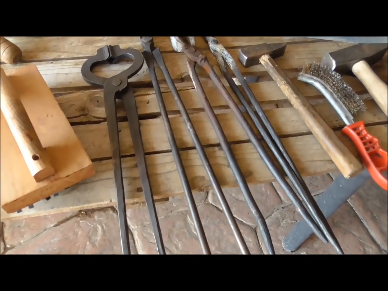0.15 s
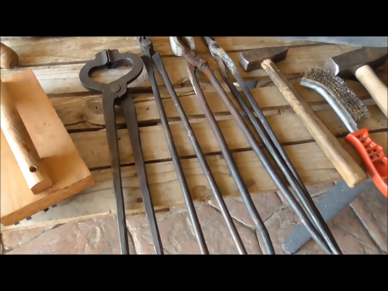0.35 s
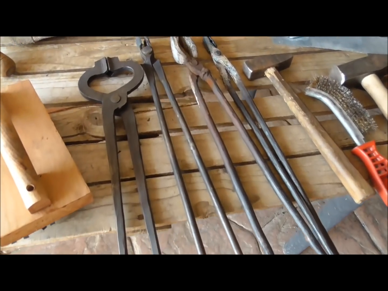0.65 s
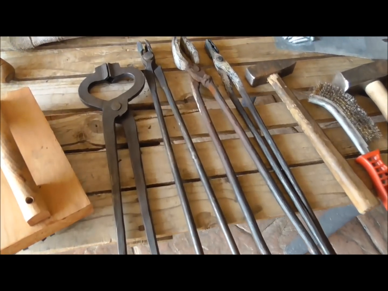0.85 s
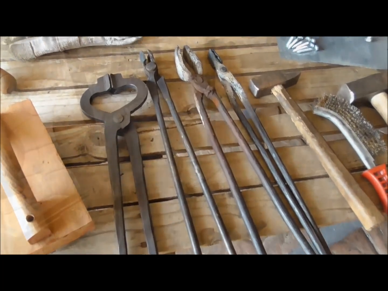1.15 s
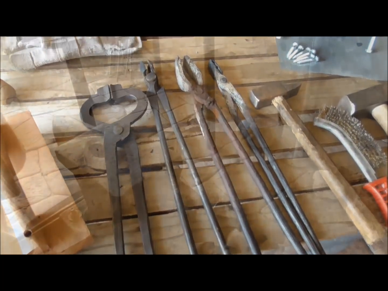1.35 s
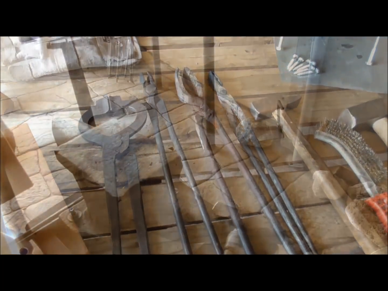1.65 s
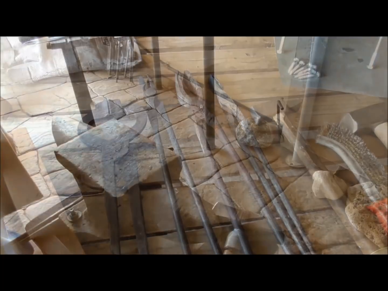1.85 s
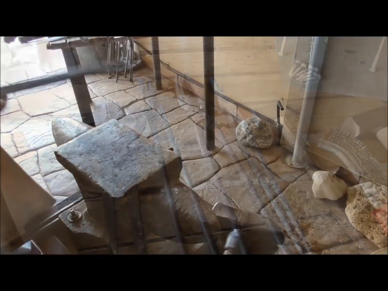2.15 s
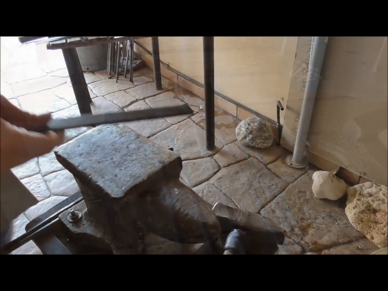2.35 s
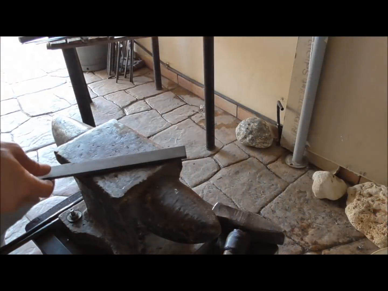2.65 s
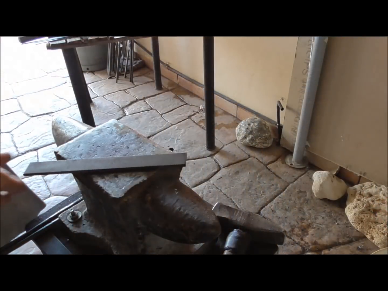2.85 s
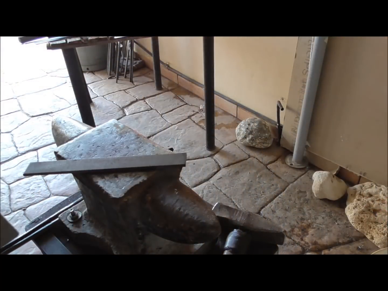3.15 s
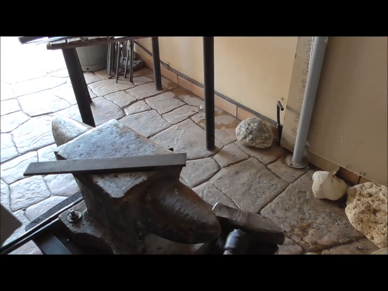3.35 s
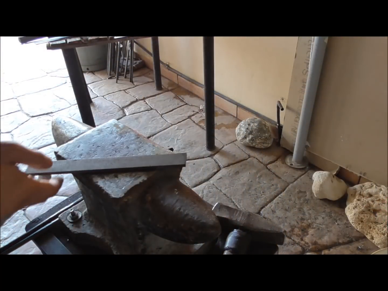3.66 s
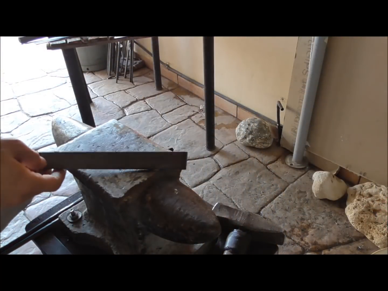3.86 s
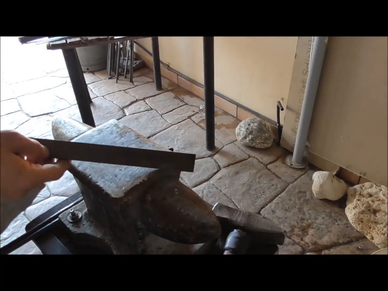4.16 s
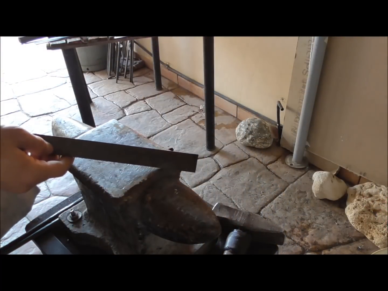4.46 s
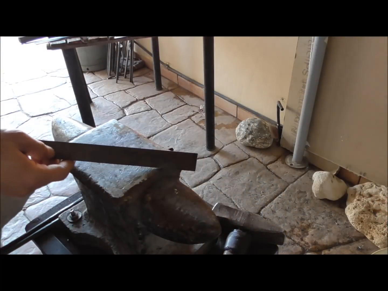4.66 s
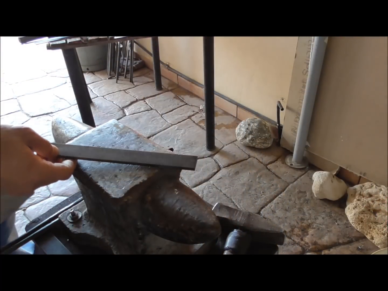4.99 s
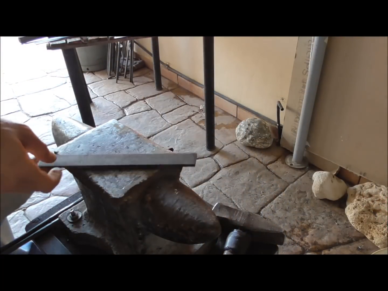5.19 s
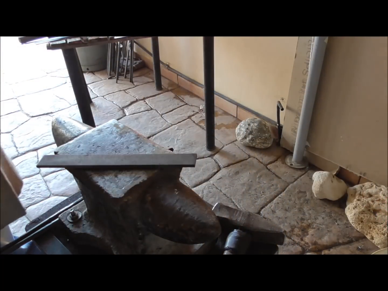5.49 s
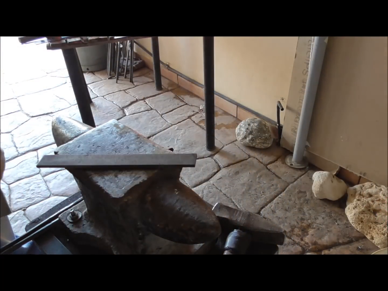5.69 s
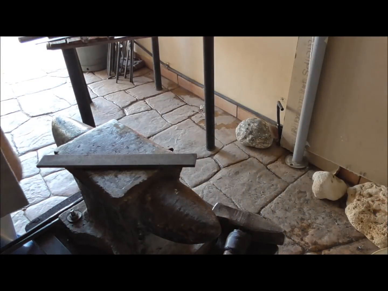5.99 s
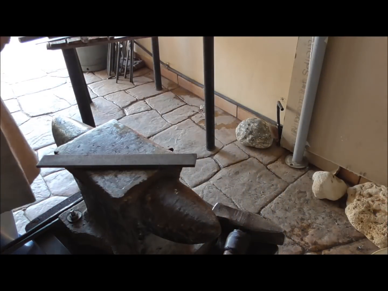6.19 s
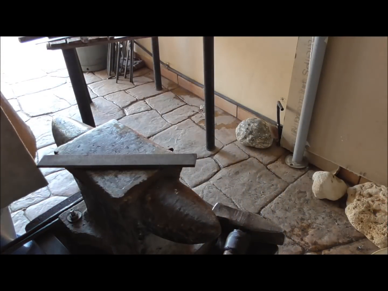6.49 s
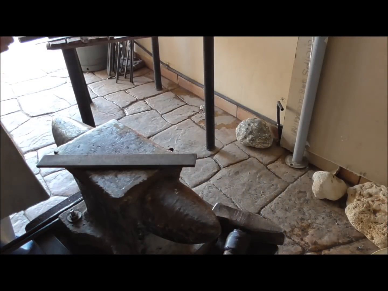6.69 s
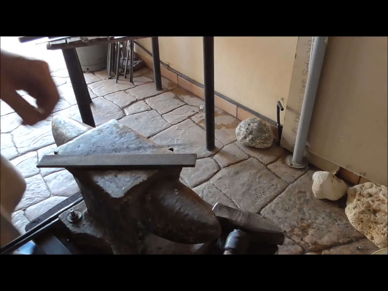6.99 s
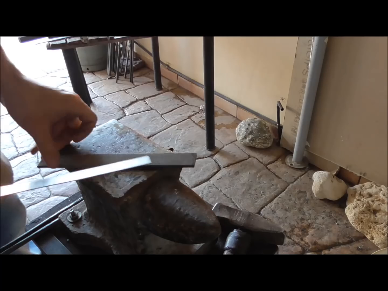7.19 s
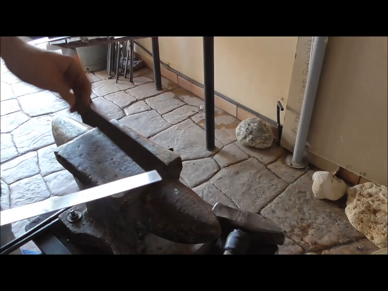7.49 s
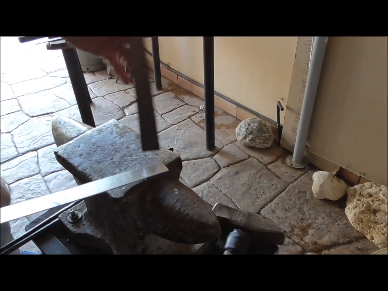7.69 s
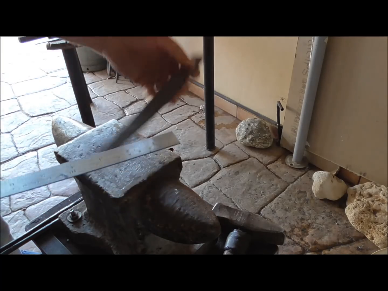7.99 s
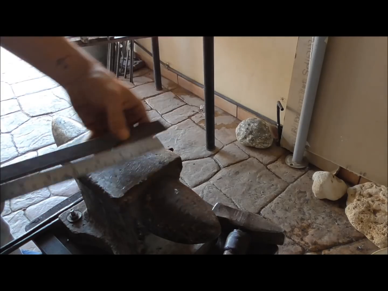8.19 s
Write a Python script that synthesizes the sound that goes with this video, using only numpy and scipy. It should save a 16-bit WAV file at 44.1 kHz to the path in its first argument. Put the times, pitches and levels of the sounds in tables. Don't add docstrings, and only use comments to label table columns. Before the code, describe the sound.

A gas forge roars steadily while small steel tools rattle, then a steel bar clinks loudly onto an anvil and is later slid about.

```python
import sys
import numpy as np
from scipy import signal
from scipy.fft import rfft, irfft
from scipy.io import wavfile

SR = 44100
rng = np.random.default_rng(int(sys.argv[2]) if len(sys.argv) > 2 else 0)


def bounce(signal):
    frames = np.transpose(np.atleast_2d(signal))
    limited = np.clip(frames, -1, 1)
    pcm = np.round(limited * 32767).astype(np.int16)
    wavfile.write(sys.argv[1], SR, pcm)


def level_to_linear(level):
    exponent = np.asarray(level, float) / 20
    return 10 ** exponent


N = 367794
TIME = np.arange(N) / SR
HZ = np.maximum(np.arange(N // 2 + 1) * SR / N, 1)
LAID, RATTLING, TAPPED, TURNED, DRAGGED, SWUNG = range(6)


def rms_one(x):
    return x / np.sqrt(np.mean(x ** 2) + 1e-20)


def at_hz(points, hz):
    point_hz, point_db = np.array(points).T
    return np.interp(np.log(hz), np.log(point_hz), point_db)


def drift(rate):
    pole = np.exp(-80 * np.pi * rate / SR)
    white = rng.standard_normal(N // 40 + 2002)
    slow = signal.lfilter([1], [1, -2 * pole, pole * pole], white)[2000:]
    return np.interp(np.arange(N) / 40, np.arange(len(slow)), rms_one(slow))


def ring(clicks, hz, t60):
    decay, turn = level_to_linear(-60 / (t60 * SR)), 2 * np.pi * hz / SR
    return signal.lfilter([0, np.sin(turn)], [1, -2 * decay * np.cos(turn), decay * decay], clicks + 1e-18)


def fade(steps, t60):
    return signal.lfilter([1], [1, -level_to_linear(-60 / (t60 * SR))], steps + 1e-18)


def swell(start, hold, rise, fall):
    rising = 1 + (TIME - start) / rise
    falling = 1 - (TIME - start - hold) / fall
    return np.clip(np.minimum(rising, falling), 0, 1)


def gesture(start, hold, db, rise_db_per_s, fall_db_per_s):
    before, after = np.maximum(start - TIME, 0), np.maximum(TIME - start - hold, 0)
    return level_to_linear(db - rise_db_per_s * before - fall_db_per_s * after)


def yard(wet_db):
    t60_s = 0.25
    echoes = rng.standard_normal(SR) * level_to_linear(-60 * TIME[:SR] / t60_s) * (TIME[:SR] > 0.004)
    echoes /= np.sqrt(np.sum(echoes ** 2))
    return 1 + level_to_linear(wet_db) * rfft(echoes, N) / (1 + (800 / HZ) ** 4)


# (frequency [Hz], side minus mid [dB])
SIDE_OVER_MID = [(60, -7), (110, -19), (200, -18), (380, -18), (700, -11), (1290, -11), (2380, -11),
                 (4400, -10.5), (8120, -6), (15000, -4.5)]


def turbulence(colour, peaks=(), wide_db=0.):
    db = at_hz(colour, HZ)
    for hz, width, up in peaks:
        db = db + up * np.exp(-2 * ((HZ - hz) / width) ** 2)
    mid, side = rfft(rng.standard_normal((2, N))) * level_to_linear(db) * yard(wet_db=-3.5)
    mid, side = irfft([mid, side * level_to_linear(at_hz(SIDE_OVER_MID, HZ) + wide_db)], N)
    return np.array([mid + side, mid - side]) / np.std(mid)


# (frequency [Hz], level [dB per Hz])
AIR_COLOUR = [(8000, -30), (11500, -1), (13000, -3), (14800, -6), (15500, -13)]


def air():
    return level_to_linear(-69 + 1.5 * drift(3.)) * turbulence(AIR_COLOUR, wide_db=5.)


# (time [s], level [dB])
HANDLING_BUMPS = [
    (1.05, -29),
    (2.28, -33),
]


def thumps():
    clicks = np.zeros(N)
    for s, db in HANDLING_BUMPS:
        clicks[round(s * SR)] = level_to_linear(db)
    return ring(clicks, 52, 0.059)


# (frequency [Hz], level [dB], t60 [s])
TRAY_MODES = [(790, 2, .07), (1164, 6, 0.052), (1390, 6, .07), (1700, -6, .08), (2230, -13, .07)]
# (time [s], level [dB])
TRAY_HITS = [
    (1.05, -49),
    (1.127, -36),
    (1.131, -33),
    (1.181, -36),
    (1.2, -41),
    (5.826, -61),
]


def tray():
    clicks = np.zeros(N)
    for s, db in TRAY_HITS:
        clicks[round(s * SR)] = level_to_linear(db)
    return sum(level_to_linear(db) * ring(clicks, hz, t60) for hz, db, t60 in TRAY_MODES)


# (time [s], peak level [dB], low part [dB], t60 [s])
TOOL_KNOCKS = [
    (1.0506, -16.5, -2.5, 0.21),
    (1.058, -12.5, -7, 0.25),
    (1.1195, -7, -5.5, 0.31),
    (1.1807, -11, 1, 0.2),
    (1.4316, -26, -6.5, 0.15),
    (5.9283, -27, -6, 0.09),
    (5.9863, -29, -8, 0.06),
    (6.0017, -15.5, -26, 0.19),
]
# (frequency [Hz], level [dB per Hz])
KNOCK_COLOUR = [(1470, -31), (2500, -13), (3370, -18.5), (4330, -3.5), (5530, -9), (7870, -5), (9450, -7.5),
                (10500, 4.5), (13500, -10.5), (15500, -11), (15900, -50)]


def tool_knocks(body):
    high, low = np.zeros(N), np.zeros(N)
    for s, peak_db, low_db, t60 in TOOL_KNOCKS:
        after = np.maximum(TIME - s, 0)
        tail = level_to_linear(-60 * after / t60)
        snap = level_to_linear(-60 * after / 0.006)
        high += level_to_linear(peak_db - 15.5) * (TIME >= s) * (0.33 * tail + 0.55 * snap)
        low += level_to_linear(peak_db + low_db - 22.5) * (1 - np.exp(-after / 0.006)) * tail
    return high * turbulence(KNOCK_COLOUR, wide_db=4.0) + low * body


# (start [s], hold [s], jingle level [dB], rustle relative to it [dB])
TOOL_SHAKES = [
    (1.182, 0.15, -35, -11.5),
    (1.437, 0.0092, -38, -16),
]


def tool_shakes(body):
    shakes = [gesture(s, hold, db, 898, 124) for s, hold, db, _ in TOOL_SHAKES]
    shaking = sum(shakes)
    dragging = sum(level_to_linear(row[-1]) * shake for row, shake in zip(TOOL_SHAKES, shakes))
    sizes = level_to_linear(2.5 * np.minimum(rng.exponential(1, N), 3))
    collisions = sizes * (rng.random(N) < 1800 / SR) * shaking
    mode_hz = np.geomspace(7500, 15200, 40)
    dealt = rng.integers(0, len(mode_hz), N)
    jingle = np.zeros((2, N))
    for k, hz in enumerate(mode_hz):
        mode_gain = level_to_linear(4.2 * rng.standard_normal((2, 1)) - abs(hz - 10600) / 350)
        jingle += ring(collisions * (dealt == k), hz, 0.058) * mode_gain
    rustle = level_to_linear(-2.0) * shaking * turbulence(KNOCK_COLOUR, wide_db=5.5)
    rustle += level_to_linear(1.0) * dragging * body
    return level_to_linear(-12.5) * jingle + rustle


def small_tools():
    body = turbulence([(600, -36), (1000, 1.0), (1300, 1.5), (1800, -2.5), (3000, -7.5),
                       (6000, -13.0), (12000, -15.5)], wide_db=4.5)
    return tool_knocks(body) + tool_shakes(body)


# (time [s], ring level [dB], crack level [dB], grip)
BAR_CLINKS = [(2.5895, -9.5, -7.5, LAID), (2.634, -21, -36, RATTLING), (2.664, -34, -27, RATTLING),
              (2.678, -52, -36, RATTLING), (3.826, -48, -75, LAID), (3.846, -59, -75, TURNED),
              (5.014, -43, -56, TAPPED), (5.303, -59, -64, LAID), (5.326, -44.5, -58, TURNED),
              (5.336, -49, -64, TAPPED), (5.399, -50, -56.5, TURNED), (5.429, -49, -62, TURNED),
              (5.434, -52, -66, TAPPED), (7.285, -56, -56, TURNED), (7.293, -52, -64, TAPPED),
              (7.353, -49, -52, TURNED), (7.41, -51, -58, TAPPED), (7.435, -59, -54, DRAGGED),
              (7.457, -46, -60, DRAGGED), (7.481, -55, -60, DRAGGED), (7.545, -50.5, -66, TAPPED),
              (7.661, -48, -60, TAPPED), (7.68, -47, -60, SWUNG), (7.73, -64, -62, SWUNG),
              (7.75, -52.5, -58, SWUNG)]


def bar_strikes():
    strikes, steps = np.zeros((6, N)), np.zeros(N)
    for s, ring_db, crack_db, grip in BAR_CLINKS:
        at = round(s * SR)
        strikes[grip, at] = level_to_linear(ring_db)
        steps[at] = level_to_linear(crack_db)
    return strikes, steps


# (start [s], hold [s], ring level [dB], grip)
BAR_SLIDES = [
    (2.621, 0.064, -33, RATTLING),
    (5.33, .015, -51, TURNED),
    (5.405, 0.028, -53.5, TURNED),
    (7.417, 0.037, -47, DRAGGED),
    (7.485, 0.045, -60, DRAGGED),
    (7.67, 0.084, -55.5, SWUNG),
]


def bar_rubbing():
    caught = rng.random(N) < 900 * level_to_linear(2.5 * drift(25.)) / SR
    patter = caught * rng.standard_normal(N)
    rubbing = np.zeros((6, N))
    for s, hold, db, grip in BAR_SLIDES:
        rubbing[grip] += patter * gesture(s, hold, db, 520, 480)
    return rubbing


def bar_crack(steps, rubbing):
    crack = fade(steps, 0.0069) + level_to_linear(-35) * fade(steps, 0.15)
    crack += level_to_linear(-7) * fade(np.abs(rubbing.sum(axis=0)), 0.016)
    mid, side = rng.standard_normal((2, N))
    band = signal.butter(2, [4000, 8000], "band", fs=SR, output="sos")
    return signal.sosfilt(band, crack * (mid + 0.61 * side * np.array([[1], [-1]])))


MODE_HZ = [1226, 2404, 3964, 4787, 5915, 6170, 7278, 8203, 9850, 10860, 12545, 13840, 15345]
# (split [Hz], t60 [s], then level [dB] when
BAR_MODES = [(8.1, 0.56, -28, -14, -30, -32, 0, -16), (14, 0.15, -21, -14, -15, -6, 0.5, -8),
             (13.6, 0.31, -11.5, -4.5, 0.5, -3.5, -8.5, -3), (21.2, 0.22, -14, -23, -22, -18, -13, -11),
             (30, 0.28, -16, -5, -3.5, -20, -7, -7), (21, .3, -26, -14, -30, -28, -14, -11),
             (25, 0.47, -25, -20, -17, -16, -5.5, -16), (23.2, 0.2, -2, 8, -4, -4, -4.5, -6),
             (21, 0.2, -16, -21, -10, -3.5, -4.5, -13), (31, 0.14, -6.5, -19, -21, -13, -10, 4),
             (24, 0.2, -16.5, -24, -15, 0, -16, -7), (21, .15, -23, -39, -33, -16, -21, -21),
             (21, .18, -26, -39, -42, -27, -32, -33)]


def bar_ring(strikes, rubbing):
    held_from_s = 3
    hand_damping = level_to_linear(-92 * np.maximum(TIME - 2.63, 0))
    out = np.zeros((2, N))
    for hz, (split_hz, t60, *grip_db) in zip(MODE_HZ, BAR_MODES):
        grip_gain = level_to_linear(grip_db)
        clicks = grip_gain @ strikes
        catches = level_to_linear(-8.5 + 3.1 * drift(20.0)) * (grip_gain @ rubbing)
        catches += clicks * (TIME > held_from_s)
        clicks = clicks * (TIME < held_from_s)
        lower = ring(clicks, hz - split_hz / 2, t60)
        upper = ring(clicks, hz + split_hz / 2, t60)
        free = np.array([lower - 0.92 * upper, 0.7 * lower - 0.6 * upper]) * hand_damping
        held = ring(catches, hz, 0.069 + 0.095 * t60)
        held = held * level_to_linear(1.6 * rng.standard_normal((2, 1)))
        out += level_to_linear(2.4 * drift(35)) * (free + held)
    return out


def bar():
    strikes, steps = bar_strikes()
    rubbing = bar_rubbing()
    out = bar_ring(strikes, rubbing) + bar_crack(steps, rubbing)
    return irfft(rfft(out) * [yard(wet_db=-8), yard(wet_db=-10)], N)


# (time [s], length [s], frequency [Hz], level [dB])
JET_WHISTLES = [
    (4.54, .15, 4650, -58),
    (6.025, .04, 5200, -57),
    (4.52, .16, 3900, -64),
    (4.3, .1, 4170, -61),
    (4.6, .1, 7700, -66),
    (3.93, .04, 7900, -64),
]


def whistles():
    out, white = np.zeros(N), rng.standard_normal(N)
    for s, length, hz, db in JET_WHISTLES:
        shape = np.exp(-2 * ((TIME - s) / length) ** 2)
        out += level_to_linear(db) * shape * rms_one(ring(white, hz, 0.23))
    return out


# (frequency [Hz], level [dB per Hz])
BENCH_ROAR_COLOUR = [(15, -76), (25, -66), (82, -20), (117, -21.5), (132, -26), (149, -3), (222, -1),
                     (331, -6), (359, -9.5), (389, -7), (515, -16.5), (569, -21), (1060, -33.5),
                     (1780, -46), (3000, -61.5), (3900, -78), (6600, -120)]
BENCH_HISS_COLOUR = [(1470, 5), (2500, -2), (2910, -9), (3000, 0.5), (3320, -3), (3720, 2), (4110, -4.5),
                     (4940, -3), (6350, -11.5), (8960, 0), (14800, -12), (15500, -20)]
# (frequency [Hz], width [Hz], level above the colour [dB])
BENCH_RESONANCES = [(132.6, 30, -5), (162.7, 20.3, 7), (216.5, 20, 6.5), (310, 44, 5.5), (459, 14, 6),
                    (507.4, 16.5, 8.5), (612, 21, 7), (689, 19, 9.5), (935, 15, -1.5), (1030, 31, 1.5),
                    (1740, 130, -26)]


def burner_from_bench(flame_db):
    roar_db = -16 + flame_db + 0.13 * drift(46.0)
    hiss_db = -50 + 0.34 * drift(9.5)
    roar = level_to_linear(roar_db) * turbulence(BENCH_ROAR_COLOUR, BENCH_RESONANCES, wide_db=1.4)
    return roar + level_to_linear(hiss_db) * turbulence(BENCH_HISS_COLOUR, wide_db=5.5)


# (frequency [Hz], level [dB per Hz])
ANVIL_ROAR_COLOUR = [(15, -88), (25, -66), (37, -78), (54, -38), (81, -36), (121, -11.5), (184, -3.5),
                     (220, -8), (248, -6), (330, 1), (472, -10), (517, -22), (600, -21.5), (730, -31),
                     (900, -34.5), (1170, -42.5), (1980, -120)]
ANVIL_UPPER_COLOUR = [(470, -7), (800, 1), (1030, -4.5), (1330, 2.5), (2110, -11), (2330, -15.5),
                      (2580, -21.5), (3000, -19.5), (3900, -46), (6600, -120)]
ANVIL_HISS_COLOUR = [(1470, -38), (2500, -2.5), (2980, -7.5), (3150, 0.5), (3610, -4), (4010, 1),
                     (5370, -5), (6500, -11), (8450, -42), (14300, -120)]
ANVIL_TOP_COLOUR = [(3820, -46), (6500, -5.5), (7710, -3), (10300, -2), (13400, -14), (14800, -22),
                    (15500, -23)]
# (frequency [Hz], width [Hz], level above the colour [dB])
ANVIL_RESONANCES = [(165.7, 12, -6), (387, 19.5, -6), (448.1, 11, -21), (193.8, 26, 2.5), (259, 32.5, 5.5),
                    (309, 26, 1.5), (385.3, 43, 4), (397, 36, 2), (471.8, 5.7, 7), (600, 27, 3),
                    (680, 20, 7.5), (942, 9.1, 3), (1022, 16, 6), (1303, 27, 2.5), (1552, 61, 3),
                    (2257, 130, 6)]


def burner_from_anvil(flame_db, jet_db):
    roar_db = -17.5 + flame_db + 0.66 * drift(7.1)
    upper_db = -45.5 + 0.68 * flame_db + 0.11 * jet_db + 0.69 * drift(6.9)
    hiss_db = -61 + jet_db + 0.91 * drift(27.0)
    top_db = -62 + 1.26 * jet_db + 1.4 * drift(4.2)
    out = level_to_linear(roar_db) * turbulence(ANVIL_ROAR_COLOUR, ANVIL_RESONANCES, wide_db=-0.1)
    out += level_to_linear(upper_db) * turbulence(ANVIL_UPPER_COLOUR, ANVIL_RESONANCES, wide_db=2.5)
    out += level_to_linear(hiss_db) * turbulence(ANVIL_HISS_COLOUR, wide_db=5.5)
    out += level_to_linear(top_db) * turbulence(ANVIL_TOP_COLOUR, wide_db=4.8)
    return out


# (time [s], depth [dB], sinking time [s])
FLAME_FLUTTERS = [
    (0.072, 3, .07),
    (0.862, 0.5, 0.28),
    (2.446, 3.5, 0.043),
    (3.17, 1.5, .2),
    (3.31, 2, 0.033),
    (4.99, 3, 0.046),
    (6.015, 4.5, 0.066),
    (6.72, 4, 0.18),
    (7.2, 4.5, 0.11),
]
# (start [s], hold [s], fall [s], lift [dB])
JET_OPENINGS = [
    (3.32, 0.092, 0.41, 2.8),
    (4.04, 0.64, 0.29, 5.5),
    (6.15, 0.22, 0.65, 6.5),
    (7.3, 0.16, .25, 2),
    (8.154, .02, .15, -1),
]


def burner():
    flame_db = -sum(db * swell(s, 0, sinking, 0.032) for s, db, sinking in FLAME_FLUTTERS)
    jet_db = sum(db * swell(s, hold, 0.33, fall) for s, hold, fall, db in JET_OPENINGS)
    bench_gain = np.interp(TIME, (2.535, 2.57), [1, 0])
    anvil_gain = np.interp(TIME, (0.75, 1.74), [0, 1])
    return burner_from_bench(flame_db) * bench_gain + burner_from_anvil(flame_db, jet_db) * anvil_gain


def scene():
    return air() + thumps() + tray() + small_tools() + bar() + whistles() + burner()


def band_limit(x):
    return signal.sosfilt(signal.butter(12, 15680, fs=SR, output="sos"), x)


def record(dry):
    duck = swell(2.6, hold=0.045, rise=0.011, fall=0.19)
    gain_db = 0.36 - 13.5 * duck
    return band_limit(dry * level_to_linear(gain_db))


dry = scene()
out = record(dry)
bounce(out)
```